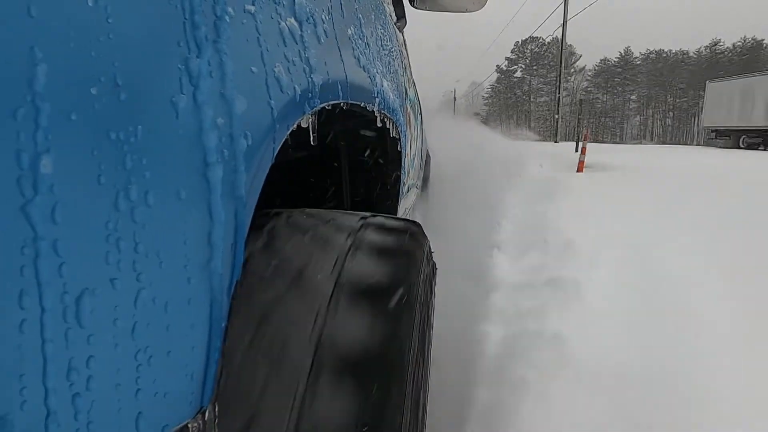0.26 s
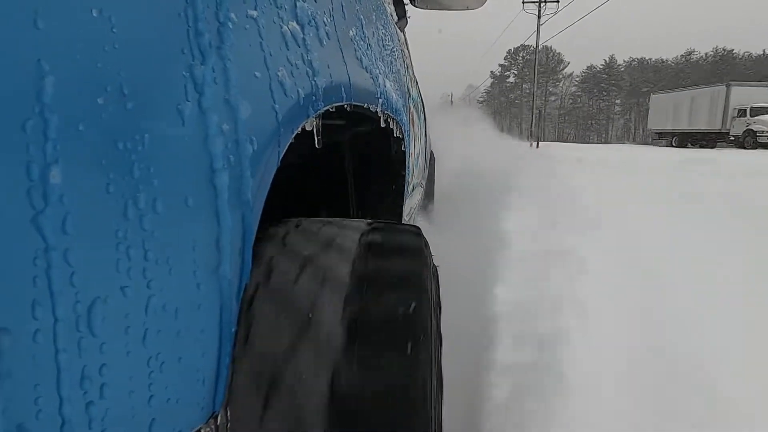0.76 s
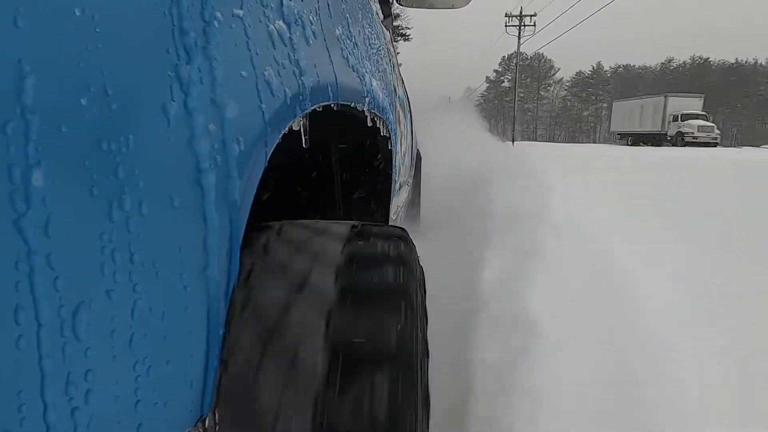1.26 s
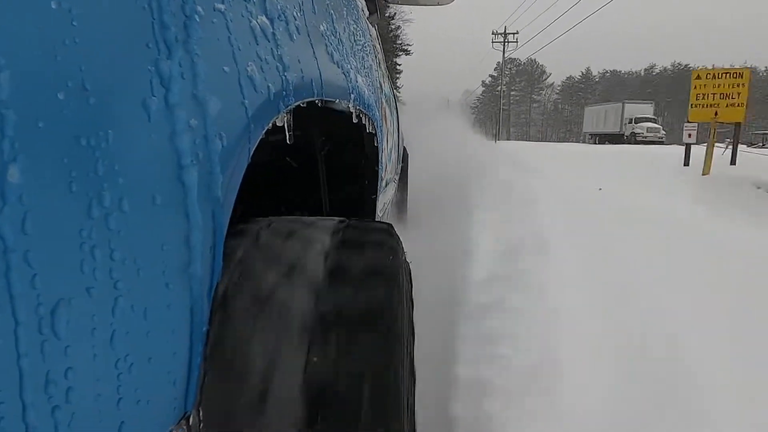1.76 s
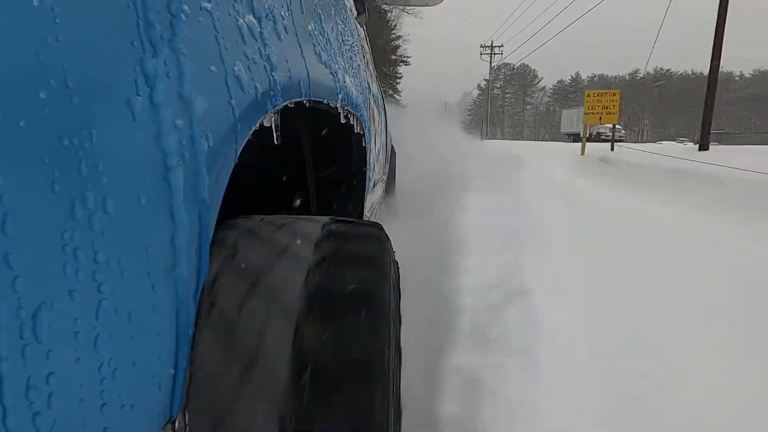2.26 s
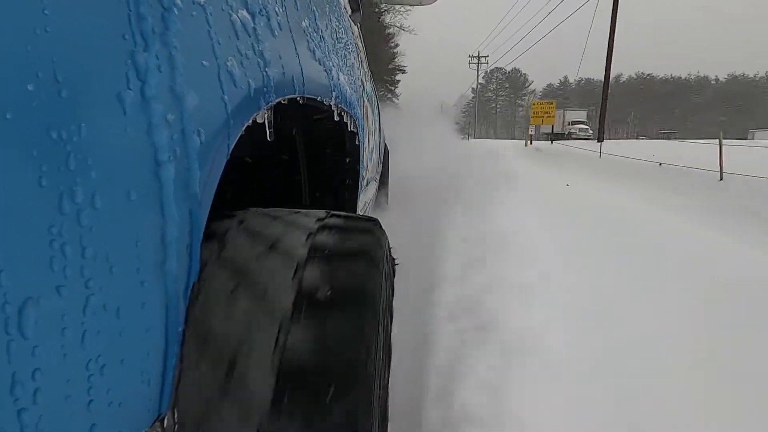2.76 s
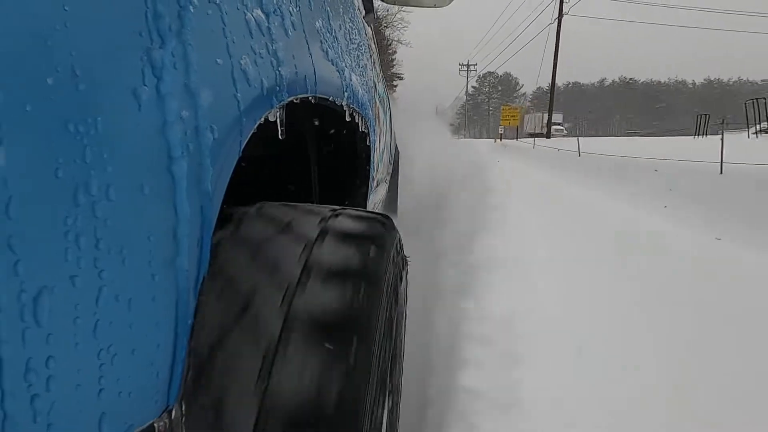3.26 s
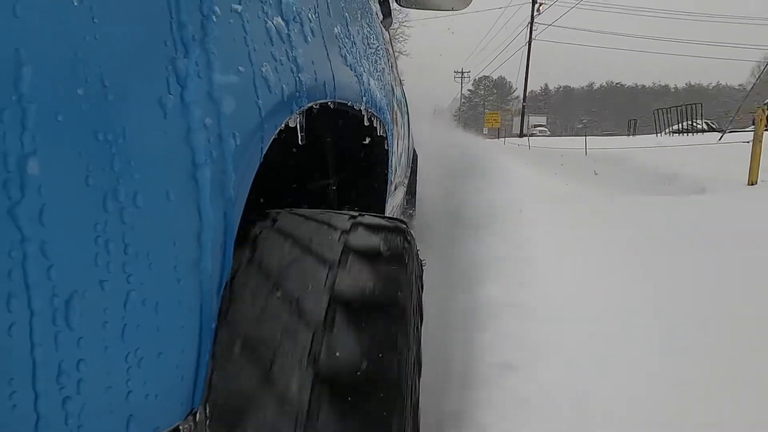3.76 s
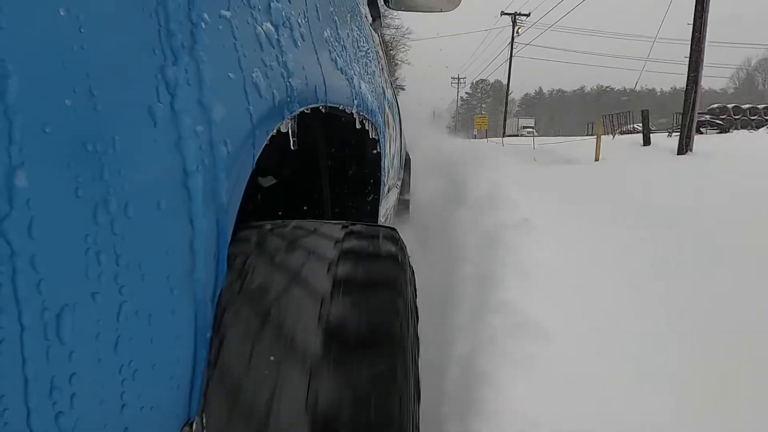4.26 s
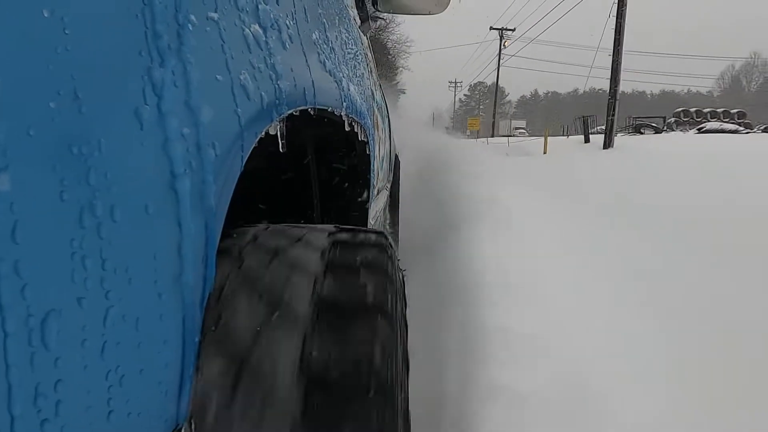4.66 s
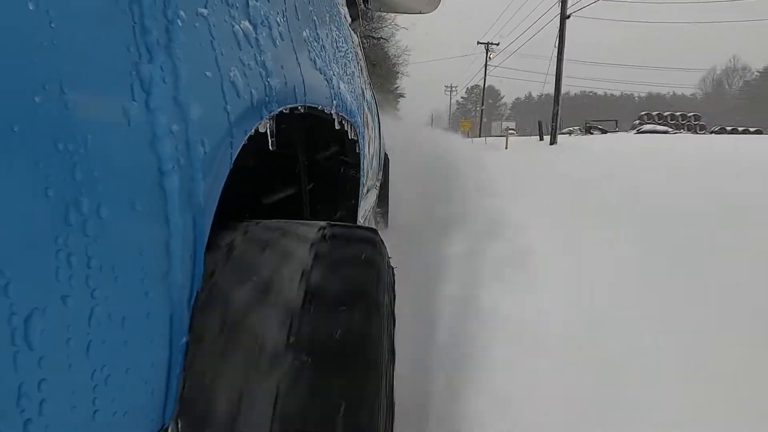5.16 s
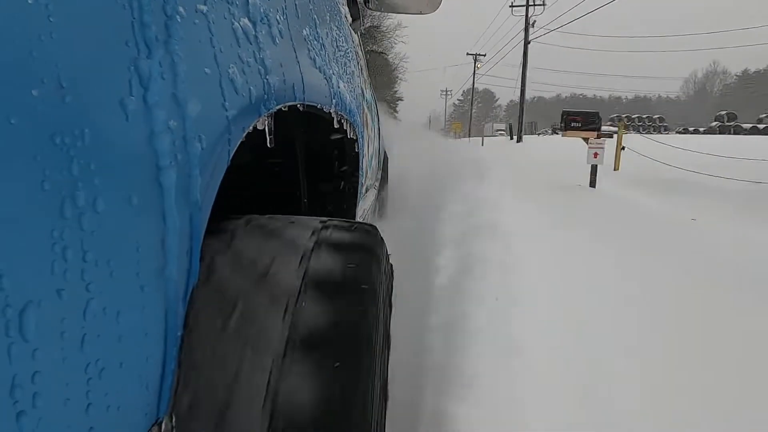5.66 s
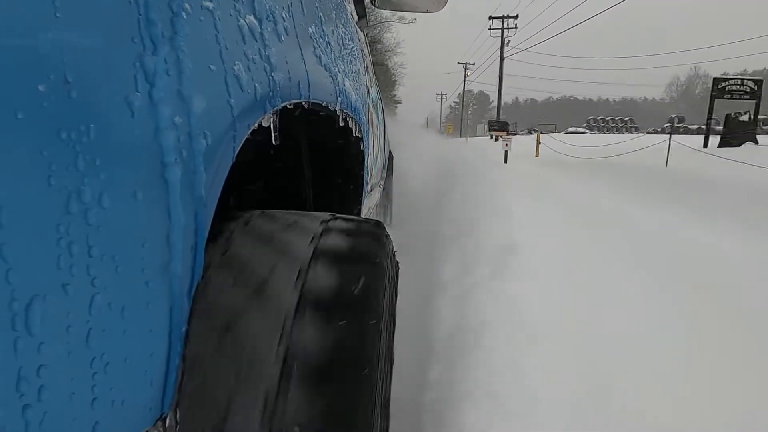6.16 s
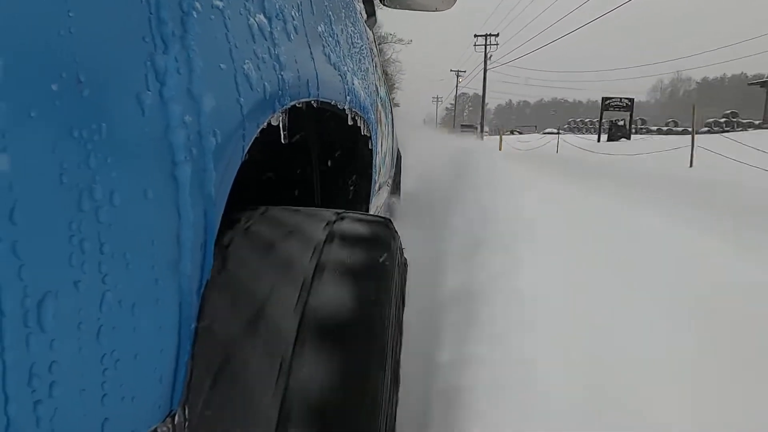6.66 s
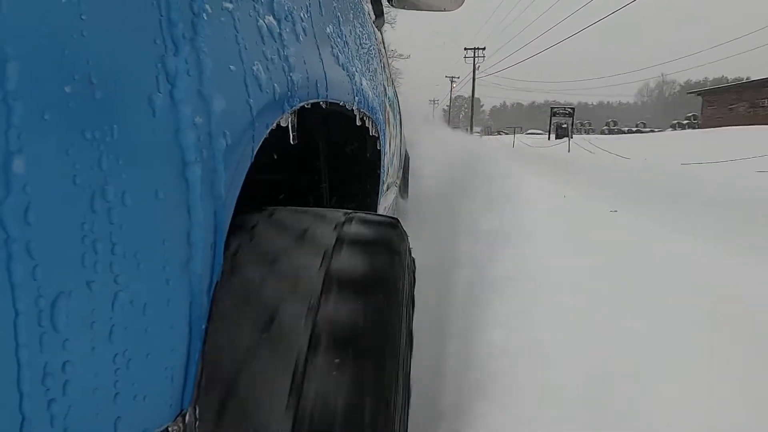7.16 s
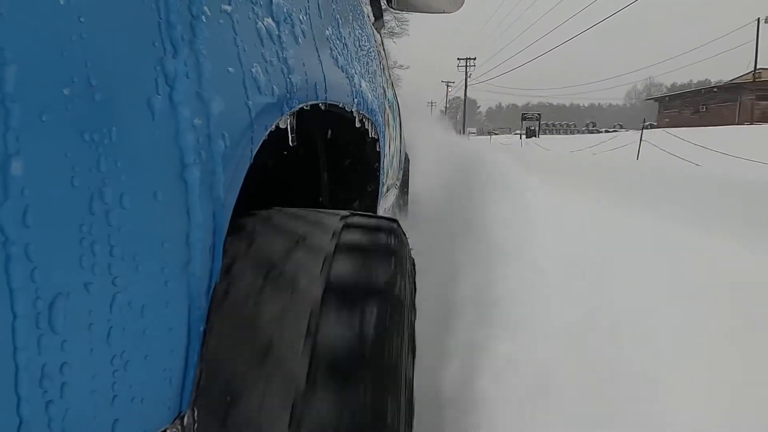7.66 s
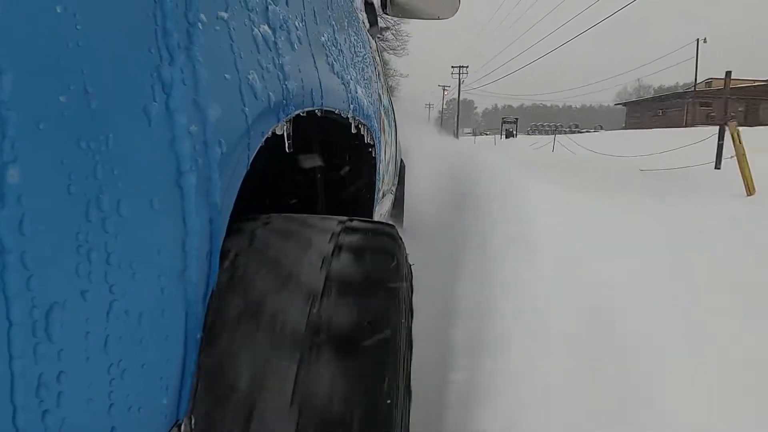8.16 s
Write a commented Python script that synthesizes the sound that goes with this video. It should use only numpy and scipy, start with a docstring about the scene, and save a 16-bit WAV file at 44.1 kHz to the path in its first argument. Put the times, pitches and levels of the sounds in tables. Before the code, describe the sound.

A microphone on a truck's flank, just ahead of the front wheel, is buffeted by deep wind. The tyre roars through snow with a grainy hiss of spray. A V8 drones steadily at low pitch, while small ice lumps clack irregularly in the hollow wheel arch. Late on, the driver lifts off and the drone quickly weakens and sinks, with a faint gear whine around the change.

```python
"""On the flank of a truck rolling through deep snow, one microphone sits just ahead of the front wheel.
Wind buffets it and the tyre roars and sprays snow: noise in flickering third-octave bands, with grains on top.
The wheel arch rings as narrow noise bands; icy lumps and crumbs strike it as short band-limited knocks.
A V8 drones in sines tied to the crank at nearly steady revs, then sinks as the driver lifts off; gears whine.
A fast gain control evens the level and the peaks are rounded."""
import sys
import numpy as np
from scipy import signal
from scipy.io import wavfile

SR = 44100
rng = np.random.default_rng(int(sys.argv[2]) if len(sys.argv) > 2 else 0)


def put_to_file(sound):
    """Save the sound as 16-bit audio at rate SR, in the file named by the first command-line argument."""
    columns = np.atleast_2d(sound).T  # one column per channel
    safe = np.clip(columns, -1, 1)
    whole_steps = np.round(safe * 32767)
    wavfile.write(sys.argv[1], SR, whole_steps.astype(np.int16))


N = 371322  # length [samples]

# All levels are those at the microphone, ahead of the gain control.
# Wind gusts: (time [s], level [dB]); their relative spectrum: (frequency [Hz], density [dB per Hz])
GUSTS = [(0, -16), (0.85, -19), (1.3, -17), (2.4, -19.5), (2.85, -16.5), (3.1, -18.5), (3.85, -18.5),
         (4.15, -21.5), (4.6, -17), (5.0, -16.5), (5.55, -19.5), (6.25, -20.5), (6.9, -14.5), (7.3, -17.5),
         (8.42, -18)]
WIND_SPECTRUM = [(9, -42), (15, -19), (25, -6), (33, 0), (42, 0.5), (70, -0.5), (95, -3), (125, -9.5),
                 (160, -15.5), (240, -20.5), (400, -24), (800, -54)]
# Tyre in the snow: (time [s], roar level [dB], spray level [dB])
SNOW = [(0, -24.5, -33.5), (0.4, -26, -33.5), (0.9, -26, -34.5), (1.3, -25.5, -34.5), (2.05, -26, -32.5),
        (2.4, -26, -35), (2.8, -21.5, -33.5), (3.4, -27, -36.5), (3.85, -23.5, -38), (4.2, -25.5, -37),
        (4.62, -23.5, -36), (4.95, -25, -35.5), (5.3, -25, -34), (5.8, -23, -35), (6.35, -25, -33),
        (6.92, -23, -35.5), (7.32, -27, -36), (8.42, -29, -36.5)]
# Relative spectra of roar and spray: (frequency [Hz], density [dB per Hz])
ROAR_SPECTRUM = [(76, -59), (130, -2.5), (146, -5), (223, -5.5), (249, -5), (447, -11.5), (537, -15.5),
                 (645, -18.5), (900, -22), (1170, -26), (2000, -33.5), (2600, -26.5), (4400, -120)]
SPRAY_SPECTRUM = [(530, 4), (900, 3), (1180, -2), (2040, -5), (2460, -8.5), (2830, -6), (4010, -9),
                  (5130, -16.5), (6480, -18.5), (7810, -27), (10100, -29), (12600, -53), (14700, -62)]
# Weight of the roar's low end: (time [s], bass gain [dB])
ROAR_BASS = [(0, 0.5), (1.0, 1), (1.7, 6.5), (3.5, 1), (4.3, -4.5), (5.2, -5), (6.2, -2.7), (7.0, -6.5),
             (7.6, 2.5), (8.42, -2)]
ROAR_BASS_HZ = 260
# Hollow of the wheel arch: (resonance [Hz], width [Hz], relative level [dB])
ARCH_RESONANCES = [(647.5, 45, -1), (749, 75, -2.5), (843, 64, -4)]
# How strongly the arch sounds: (time [s], level [dB])
ARCH_LEVEL = [(0, -40), (1.0, -46), (1.3, -36.5), (2.9, -44), (3.4, -46), (3.8, -36.5), (4.9, -41.5),
              (5.35, -34), (5.8, -45), (6.5, -34), (7.0, -40.5), (7.3, -45.5), (8.42, -49)]
# Loose crumbs on the arch: (start [s], length [s], rms before the envelope [dB], lowest [Hz], highest [Hz])
SPATTERS = [(2.288, 0.022, -38, 1600, 4000), (3.262, 0.045, -37, 1500, 3800), (3.39, 0.09, -40, 1000, 3000),
            (3.66, 0.1, -39, 500, 1500), (4.58, 0.028, -35, 1500, 2800), (5.585, 0.04, -38, 1400, 3400),
            (7.29, 0.05, -41, 1600, 4000), (8.318, 0.05, -43, 1400, 3200)]
# Icy lumps on the arch: (time of crest [s], crest of the bare knock [dB], lowest [Hz], highest [Hz])
LUMPS = [(0.1045, -26, 2800, 5100), (0.1151, -11, 1000, 3400), (0.5326, -26, 2500, 3700),
         (0.6393, -22, 2000, 4600), (1.0418, -16, 1700, 3600), (1.0485, -31, 3600, 5300),
         (1.0983, -27, 2900, 4300), (1.1882, -24, 2300, 3900), (1.2097, -31, 4200, 6800),
         (1.9783, -16, 1600, 4700), (2.0739, -16, 1000, 2800), (2.2958, -13, 1100, 4300),
         (2.5907, -21, 600, 1900), (3.0581, -28, 2900, 5200), (3.0635, -16, 3200, 5200),
         (3.0686, -18, 1700, 4100), (3.2517, -32, 5000, 7500), (3.2646, -31, 2700, 4000),
         (3.275, -13, 600, 1900), (3.2777, -20, 1600, 2700), (3.2837, -22, 2800, 4300),
         (3.2894, -30, 1700, 2800), (3.3043, -32, 2700, 3600), (3.3702, -22, 700, 2800),
         (3.4053, -21, 900, 2200), (3.4141, -23, 1000, 1900), (3.4342, -21, 1400, 3600),
         (3.4679, -31, 2800, 3800), (3.4724, -22, 1100, 3500), (3.6339, -23, 1000, 2400),
         (3.6424, -24, 1500, 3300), (3.683, -18, 600, 1200), (3.6832, -20, 1500, 3200),
         (3.6933, -21, 700, 1500), (3.7023, -23, 600, 1500), (3.7144, -21, 600, 2100),
         (3.725, -23, 800, 2000), (3.7888, -41, 4800, 6500), (3.8155, -22, 900, 2000),
         (3.9264, -19, 1200, 4000), (4.067, -29, 1100, 2200), (4.1802, -19, 1500, 3800),
         (4.2045, -28, 1300, 2300), (4.4352, -17, 600, 2200), (4.4382, -22, 1400, 2800),
         (4.4437, -29, 2600, 4300), (4.5838, -18, 1100, 2800), (4.5911, -17, 1200, 2100),
         (4.5975, -22, 1900, 2700), (4.5998, -27, 3600, 4600), (4.6023, -19, 2000, 4300),
         (4.6044, -25, 1900, 2800), (4.8019, -14, 1200, 3100), (4.8507, -25, 1500, 3100),
         (5.0934, -30, 2800, 3900), (5.1355, -14, 1500, 4200), (5.2981, -30, 3900, 7000),
         (5.5926, -19, 1600, 2500), (5.6108, -28, 2300, 3900), (5.7333, -19, 1700, 4700),
         (5.8313, -22, 1200, 2900), (5.9917, -17, 800, 3000), (6.0877, -35, 5400, 7600),
         (6.0961, -26, 1600, 2500), (6.2243, -33, 5900, 9000), (6.3599, -26, 2800, 5200),
         (6.9376, -23, 1300, 2400), (7.2119, -38, 5400, 7500), (7.2949, -25, 1900, 2900),
         (7.3233, -23, 1500, 3900), (7.4748, -28, 1000, 2100), (7.7448, -12, 1200, 3400),
         (8.1205, -16, 600, 2600), (8.222, -26, 1200, 2200), (8.3215, -22, 1000, 3100),
         (8.3327, -14, 600, 2400), (8.3355, -30, 1900, 2700), (8.343, -23, 1400, 2300),
         (8.3509, -24, 1500, 2300), (8.3593, -22, 2400, 3700), (8.3622, -24, 900, 2300),
         (8.3761, -27, 2700, 3500)]
SPLINTER_DECAY_S, SPLINTER_SHARE = 0.004, 0.07
TICK_DB, TICK_LOW_HZ, TICK_HIGH_HZ = -25, 4000, 8000  # hard edge, relative to the knock
# Crankshaft: (time [s], speed [turns per s])
CRANK = [(0, 27.93), (6.3, 27.93), (6.5, 27.5), (6.75, 26.5), (7.0, 23.9), (7.75, 22.7), (8.42, 22.0)]
# Exhaust lines: (multiple of the crank rate) and (level relative to the drone [dB])
EXHAUST_ORDERS = [1.5, 4, 5.5, 6.5, 7, 7.5, 8, 10, 14.5]
EXHAUST_DB = [-18, -0.5, -17, -8, -16, -19.5, -9.5, -23, -30.5]
# Thin hum lines that follow the drone: (multiple of the crank rate) and (level relative to the drone [dB])
HUM_ORDERS = [30.7, 61.45]
HUM_DB = [-30, -32]
# Gear lines, heard only near the casing resonance: (multiple of the crank rate)
GEAR_ORDERS = [81.65, 90.2, 99.6]
CASING_HZ, CASING_WIDTH_HZ = 2290, 85
# Throttle: drone and whine rise ahead of the lift; the drone drops, then both fade
LIFT_S, SWELL_S, DROP_S = 6.7, 0.95, 0.27
DRONE_DB, SWELL_DB, DROP_DB, FADE_DB_PER_S = -22, 1, 11.5, 1
WHINE_DB, OVERRUN_WHINE_DB, WHINE_FADE_DB_PER_S = -62, -50, 9
CUTOFF_HZ = 14800  # top of the recorder's range


def from_db(db):
    """Decibels to amplitude gain."""
    return 10 ** (np.asarray(db) / 20)


def rms_one(x):
    """Scale to rms 1."""
    return x / np.sqrt(np.mean(x ** 2) + 1e-20)


def in_time(rows):
    """Each level or speed column of a timed table, sample by sample."""
    s, *columns = np.transpose(rows)
    return [np.interp(np.arange(N) / SR, s, column) for column in columns]


def drift(rate):
    """Slow random wander of rms 1: noise through a two-pole low-pass at about rate [Hz]."""
    step = 40  # samples between the slow points
    pole = np.exp(-2 * np.pi * rate * step / SR)
    chance = rng.standard_normal(N // step + 2002)
    slow = signal.lfilter([1], [1, -2 * pole, pole * pole], chance)[2000:]  # settled part
    return np.interp(np.arange(N) / step, np.arange(len(slow)), rms_one(slow))


def band_filter(order, low_hz, high_hz):
    """Band-pass between two frequencies."""
    return signal.butter(order, [low_hz, high_hz], "band", fs=SR, output="sos")


def banded_noise(spectrum, shared_db, own_db, rate):
    """Third-octave bands of noise that flicker partly together, partly alone; rms 1."""
    hz, db = np.transpose(spectrum)
    edges = hz[0] * 2 ** np.arange(0, np.log2(hz[-1] / hz[0]) + .3, 1 / 3)
    white = rng.standard_normal((2, N + SR // 2))  # neighbouring bands take different noise
    together, out = drift(rate), 0
    for k, (low, high) in enumerate(zip(edges, edges[1:])):
        band = signal.sosfilt(band_filter(2, low, high), white[k % 2])[-N:]
        level_db = np.interp(np.log(low * high) / 2, np.log(hz), db)
        flicker_db = shared_db * together + own_db * drift(rate)
        out = out + from_db(level_db + flicker_db) * band
    return rms_one(out)


def knock(clicks, low_hz, high_hz):
    """Short contacts: clicks ring briefly in one steep-edged band; a unit click has crest 1."""
    chain = band_filter(3, low_hz, high_hz)
    ring = signal.sosfilt(chain, np.arange(256) == 0)
    crest = np.abs(signal.hilbert(ring)).max()
    return signal.sosfilt(chain, clicks + 1e-18) / crest


def wind():
    """Gusts push on the microphone itself: low noise whose bands flicker."""
    (gust_db,) = in_time(GUSTS)
    return from_db(gust_db) * banded_noise(WIND_SPECTRUM, shared_db=0.5, own_db=1.0, rate=3.4)


def weigh_bass(x):
    """Raise or lower the low end over time by adding or subtracting a low-passed copy."""
    bass = signal.lfilter(*signal.butter(1, ROAR_BASS_HZ, fs=SR), x)
    return x + (from_db(in_time(ROAR_BASS)[0]) - 1) * bass


def tyre_roar():
    """The tyre churns the snow: broad noise with quickly flickering bands and shifting bass."""
    roar_db, _ = in_time(SNOW)
    return weigh_bass(from_db(roar_db) * banded_noise(ROAR_SPECTRUM, shared_db=0.06, own_db=0.8, rate=12))


def grit(per_s, level_db):
    """Small grains strike at random in clumps, with pitches spread over the treble."""
    sizes = from_db(6 * np.minimum(rng.exponential(1, N), 3)) * rng.choice([-1, 1], N)
    born = rng.random(N) < per_s * from_db(6 * drift(4)) / SR
    pitches, dealt = np.geomspace(1200, 7000, 6), rng.integers(0, 6, N)
    grains = 0
    for k, hz in enumerate(pitches):
        clicks = sizes * born * (dealt == k)
        grains = grains + knock(clicks, hz / 1.5, hz * 1.57) * 2000 / hz  # higher grains are weaker
    return from_db(level_db) * rms_one(grains)


def snow_spray():
    """Flung snow: a flickering hiss with separate grains in it, under one changing level."""
    _, spray_db = in_time(SNOW)
    hiss = banded_noise(SPRAY_SPECTRUM, shared_db=-0.7, own_db=0.38, rate=13.4)
    return from_db(spray_db) * (hiss + grit(per_s=170, level_db=-18.0))


def arch():
    """Churning noise rings in the hollow of the arch; each resonance swells and sinks by itself."""
    out = 0
    for hz, width_hz, db in ARCH_RESONANCES:
        chain = band_filter(2, hz - width_hz / 2, hz + width_hz / 2)
        swell = from_db(db + 2.6 * drift(2.6))
        out = out + swell * rms_one(signal.sosfilt(chain, rng.standard_normal(N)))
    return from_db(in_time(ARCH_LEVEL)[0]) * rms_one(out)


def spatters():
    """Bursts of dense uneven crumbs under a rounded envelope."""
    longest = 4000  # samples; a longer burst is cut here
    out = np.zeros(N + longest)
    chances = rng.standard_normal((len(SPATTERS), longest))
    for (s, length, db, low_hz, high_hz), chance in zip(SPATTERS, chances):
        shape = np.sin(np.pi * np.clip(np.arange(longest) / (length * SR), 0, 1))
        # the cube leaves a few large grains among many small
        crumbs = rms_one(knock(chance ** 3.0, low_hz, high_hz))
        out[round(s * SR):][:longest] += from_db(db) * shape * crumbs
    return out[:N]


def lumps():
    """Each lump is one short knock with a hard edge, and breaks into a few splinters."""
    span = 800  # samples per lump
    out, after = np.zeros(N + span), np.arange(span)
    fading = np.exp(-after / (SPLINTER_DECAY_S * SR))
    chances = rng.standard_normal((len(LUMPS), span))
    for (s, db, low_hz, high_hz), chance in zip(LUMPS, chances):
        splinters = SPLINTER_SHARE * chance * (np.abs(chance) > 2) * fading
        blow = (after == 0) + splinters
        tick = from_db(TICK_DB) * knock(blow, TICK_LOW_HZ, TICK_HIGH_HZ)
        # a narrow ring reaches its crest later, so it starts earlier
        at = round((s - .75 / (high_hz - low_hz)) * SR)
        out[at:at + span] -= from_db(db) * (knock(blow, low_hz, high_hz) + tick)
    return out[:N]


def throttle():
    """Levels of exhaust drone and gear whine in dB, before and after the driver lifts off."""
    since = np.arange(N) / SR - LIFT_S
    swell = np.clip(1 + since / SWELL_S, 0, 1)  # complete at the lift
    lifted, after = np.clip(since / DROP_S, 0, 1), np.maximum(since - DROP_S, 0)
    drone_db = DRONE_DB + SWELL_DB * swell - DROP_DB * lifted - FADE_DB_PER_S * after
    whine_db = WHINE_DB + (OVERRUN_WHINE_DB - WHINE_DB) * swell - WHINE_FADE_DB_PER_S * after
    return drone_db, whine_db


def engine():
    """Exhaust orders as slightly wavering sines, plus gear lines lit by a casing resonance."""
    (turns,), (drone_db, whine_db) = in_time(CRANK), throttle()
    turns = turns * (1 + 0.00202 * drift(1.186))  # the revs hunt a little in the uneven snow
    angle = 2 * np.pi * np.cumsum(turns) / SR
    drone = whine = 0
    for order, db in zip(EXHAUST_ORDERS + HUM_ORDERS, EXHAUST_DB + HUM_DB):
        waver_db = 1.3 * drift(2) + 1.6 * drift(9)
        drone = drone + from_db(db + waver_db) * np.sin(order * angle + rng.uniform(0, 2 * np.pi))
    for order in GEAR_ORDERS:
        casing = np.exp(-((order * turns - CASING_HZ) / CASING_WIDTH_HZ) ** 2 / 2)
        whine = whine + casing * from_db(1.7 * drift(13)) * np.sin(order * angle)
    return np.sqrt(2) * (from_db(drone_db) * drone + from_db(whine_db) * whine)  # sine levels are rms


def scene():
    """Wind, tyre, snow, arch and engine add at the single microphone."""
    churning = wind() + tyre_roar() + snow_spray() + arch()
    return (churning + engine() + lumps() + spatters())[None]


def record(dry):
    """Gain control pulls the level part-way to a target, peaks are rounded, the top is cut."""
    keep = np.exp(-1 / (0.053 * SR))  # level follower, 53 ms
    power = signal.lfilter([1 - keep], [1, -keep], dry ** 2, zi=[[.02]])[0]
    level_db = 10 * np.log10(power + 1e-9)
    evened = dry * from_db(-0.4 * (level_db + 16.5))  # removes 40 % of the distance from -16.5 dB
    rounded = 0.76 * np.tanh(evened / 0.76)
    return signal.sosfilt(signal.cheby2(12, 70, CUTOFF_HZ, fs=SR, output="sos"), rounded)


dry = scene()
out = record(dry)
put_to_file(out)
```